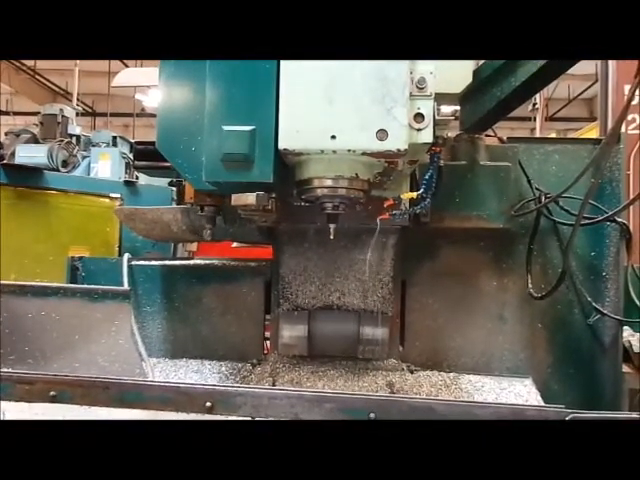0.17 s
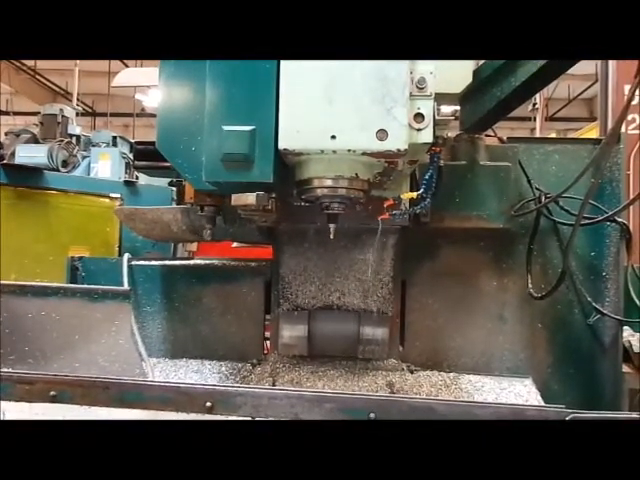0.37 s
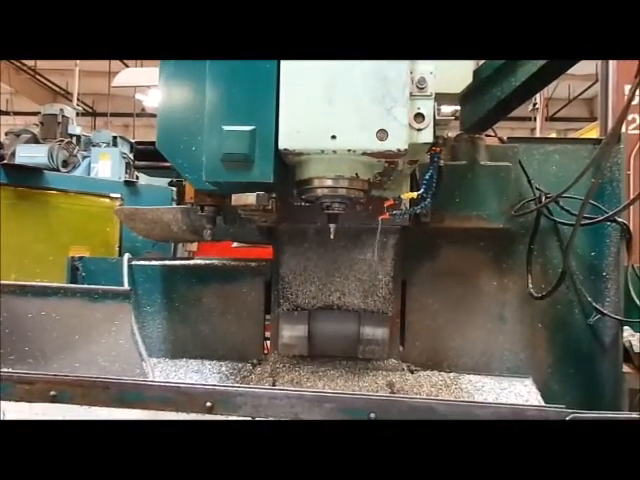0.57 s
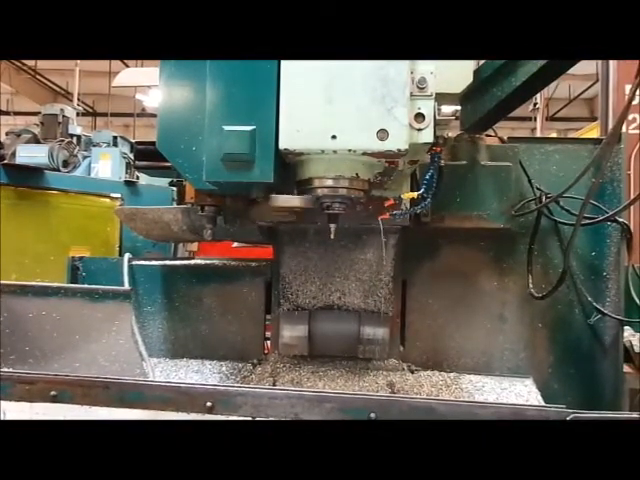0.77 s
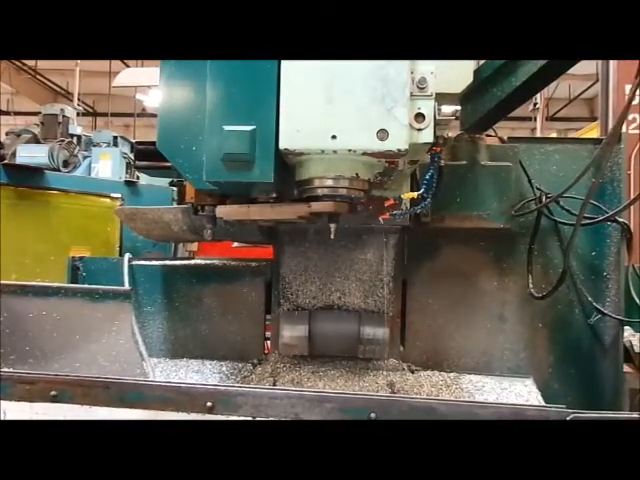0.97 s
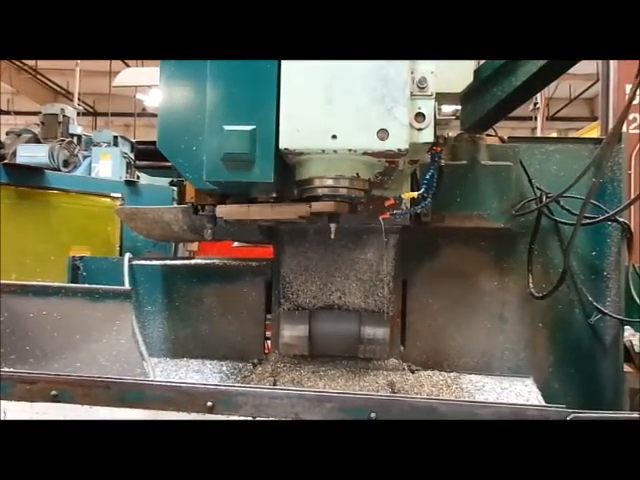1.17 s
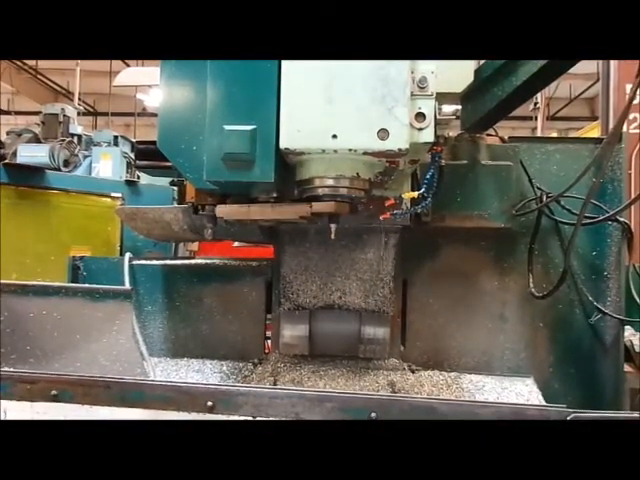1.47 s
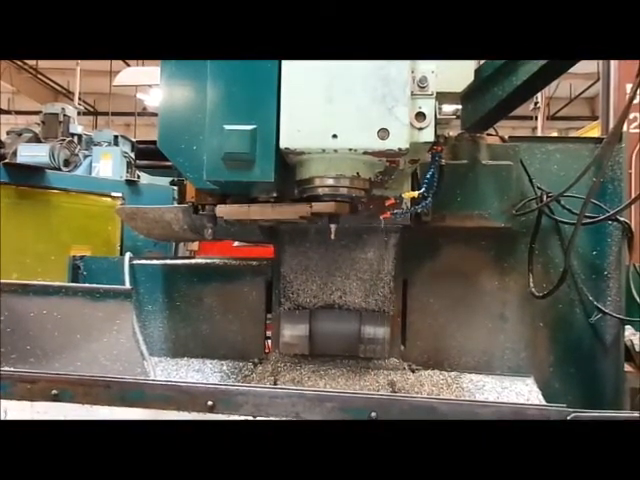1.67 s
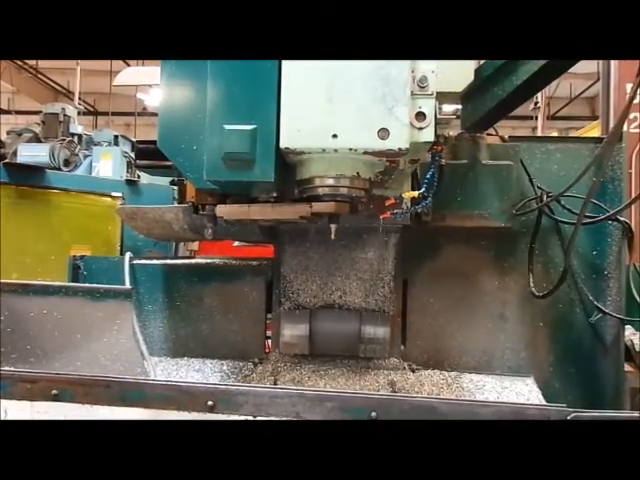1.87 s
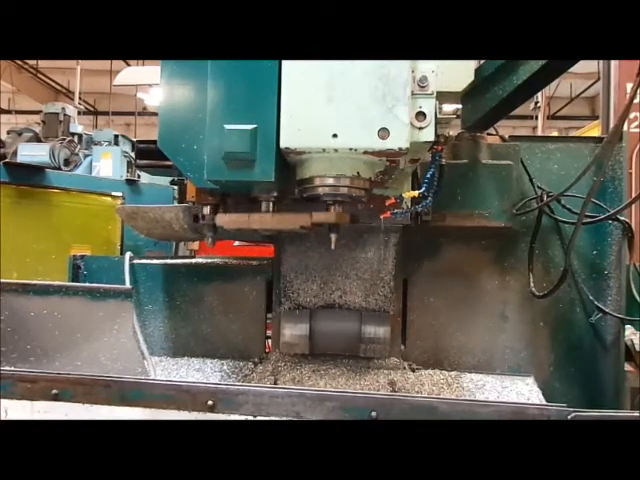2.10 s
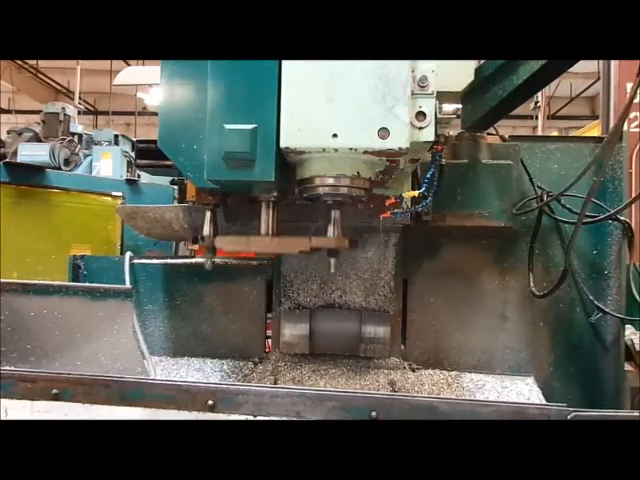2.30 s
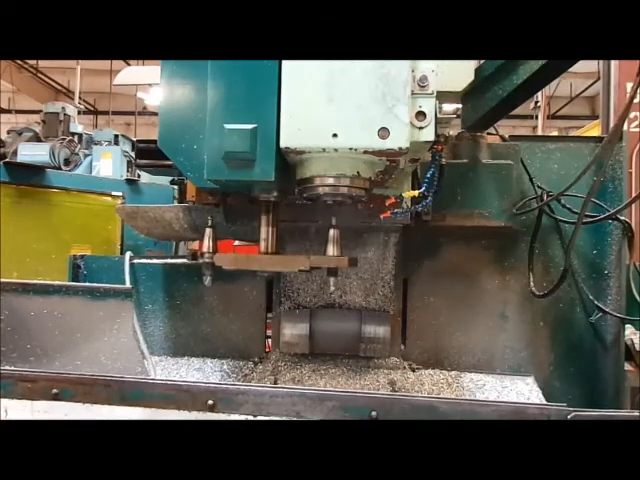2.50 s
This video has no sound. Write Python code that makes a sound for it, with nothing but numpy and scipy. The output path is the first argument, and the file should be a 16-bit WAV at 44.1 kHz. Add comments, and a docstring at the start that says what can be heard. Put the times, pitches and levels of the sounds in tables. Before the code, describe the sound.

A milling machine changes its tool over steady fan and pump hum. Latch clacks at 0.4-0.6 s, uneven drive rumble from 0.7, a hard steel clank at 0.9-1.0 with short hall tail, and lock clacks near 1.25-1.3. Thin bright air hiss grows from 1.5; a bang at 2.04 opens into a loud, turbulent, ringing blast from 2.13, faintly whistling, with a dull thump and shudder at 2.5 as it continues to the end.

```python
"""A milling machine changes its tool in a humming workshop, with hard walls close to the air jet.
First the changer arm unlatches, swings on a rumbling drive and clanks onto the tool holders: noise bursts
and decaying sines, with a short hall tail. Compressed air then hisses through the spindle as combed noise,
and the drawbar lets go with a bang. Turbulent noise roars through the ringing, opening taper and its gap
whistles, while the arm pulls the tools down, thumps against its stop and shudders."""
import sys
import numpy as np
from scipy import signal
from scipy.fft import rfft, irfft, next_fast_len
from scipy.io import wavfile
from scipy.ndimage import uniform_filter1d, map_coordinates

SR = 44100
rng = np.random.default_rng(int(sys.argv[2]) if len(sys.argv) > 2 else 0)


def master_out(mix):
    """Clip the mix to full scale and print it as 16-bit PCM to the path in sys.argv[1]."""
    frames = np.transpose(np.atleast_2d(mix))
    ceiling = np.clip(frames, -1, 1)
    pcm = np.round(ceiling * 32767).astype(np.int16)
    wavfile.write(sys.argv[1], SR, pcm)


N = 116865  # samples, 2.65 s

# Colour of the workshop rush: (frequency [Hz], relative level per Hz [dB])
SHOP_COLOUR = [(25, -22), (45, -16), (75, -13), (130, -7), (200, -4), (300, -3), (420, -1), (600, 0),
               (850, -1.5), (1250, -4), (1800, -6), (2700, -8.5), (4000, -14), (5700, -22), (8500, -25),
               (10300, -25), (11000, -15.5), (12600, -19), (15000, -28)]
# Motor and pump tones, before drift and flutter: (frequency [Hz], rms level [dB])
HUM_TONES = [(58, -55), (178, -53), (269.5, -44), (533, -46), (985, -48)]
# Drive of the swinging arm, before its unevenness: (start [s], attack [s], hold [s], t60 [s], level [dB])
SWING_BURST = (.68, .06, .62, .9, -33.5)
# Colour of the arm's drive: (frequency [Hz], relative level per Hz [dB])
SWING_COLOUR = [(60, -25), (95, -8), (135, 6), (185, -3), (400, 0), (750, 0), (1500, -3.5), (3000, -8),
                (5000, -19), (9000, -25), (14000, -35)]

# Modes of the struck latch: (frequency [Hz], level relative to the clack [dB], t60 [s])
LATCH = [(1550, -3, .06), (2230, 0, .05), (12700, -14, .04)]
# Modes of the cam: (frequency [Hz], level relative to the clack [dB], t60 [s])
CAM = [(1530, 3, .06), (1950, -2, .08), (3550, -8, .05)]
# Modes of the gripping jaw: (frequency [Hz], level relative to the clack [dB], t60 [s])
JAW = [(1290, -4, .06), (3270, 1, .03), (5550, -4, .02)]
# Modes of the tool holder: (frequency [Hz], level relative to the clack [dB], t60 [s])
HOLDER = [(430, -13, .15), (820, -9, .07), (1680, -10, .15), (2320, -1, .05), (3488, -15, .16),
          (4050, -11, .06)]
# Modes of the lock: (frequency [Hz], level relative to the clack [dB], t60 [s])
LOCK = [(790, -2, .06), (1600, -1, .014), (2400, 4, .012)]
# Mode of the buffer: (frequency [Hz], level relative to the clack [dB], t60 [s])
BUFFER = [(740, 12, .035)]
# Blows of the changer: (time [s], part struck, thud [dB], clang [dB], clack [dB], crack [dB],
# factor on the t60 of the four noise layers)
BLOWS = [(.392, LATCH, -35, -21.5, -18, -40, 1.0), (.409, BUFFER, -35, -22, -33, -50, .8),
         (.4735, CAM, -32, -20, -20.5, -35, 1.2), (.503, BUFFER, -35, -25, -37, -55, .8),
         (.537, LATCH, -35, -24, -28, -43, 1.3), (.577, CAM, -34, -22, -36, -55, .9),
         (.665, CAM, -30, -34, -36, -33, 2.0), (.835, JAW, -45, -38, -31, -23, 1.0),
         (.898, JAW, -26, -19, -12.5, -10, .36), (.905, JAW, -33, -18, -13, -32, .9),
         (.9365, HOLDER, -18, -11, -5.5, -13, 1.2), (.961, HOLDER, -21, -16, -15, -23, 1.6),
         (.985, HOLDER, -19, -17, -13, -20, 1.4), (1.236, JAW, -42, -35, -28, -43, .6),
         (1.2655, LOCK, -33, -19.5, -16, -48, .7), (1.28, BUFFER, -32, -13.5, -28, -55, .38),
         (1.307, LOCK, -28, -19, -13.5, -48, .5)]
# Lowest noise layer of a blow: (colour as (frequency [Hz], relative level per Hz [dB]), attack [s],
# t60 before the blow's factor [s])
THUD_LAYER = ([(50, -26), (95, -12), (128, 4), (190, -4), (310, 3), (480, -2), (750, -20), (2000, -60)],
              .008, .25)
# Low-mid layer: (colour as (frequency [Hz], relative level per Hz [dB]), attack [s], t60 before factor [s])
CLANG_LAYER = ([(200, -28), (450, -4), (600, 0), (780, 0), (1000, -2), (1500, -13), (4000, -60)], .002, .11)
# Upper-mid layer: (colour as (frequency [Hz], relative level per Hz [dB]), attack [s], t60 before factor [s])
CLACK_LAYER = ([(500, -25), (1100, -3), (1600, 1), (2350, 0), (3200, -8), (4400, -21), (7000, -38),
               (15000, -60)], .0006, .075)
# Treble layer: (colour as (frequency [Hz], relative level per Hz [dB]), attack [s], t60 before factor [s])
CRACK_LAYER = ([(1800, -25), (3800, 3), (5000, -2), (6200, 0), (9000, -3), (12500, -8), (14500, -13)],
               .0004, .07)
# Resonances of the steel housing: (frequency [Hz], width [Hz], level [dB])
HOUSING_MODES = [(400, 120, -4), (530, 90, -6), (770, 90, -2), (1170, 25, -3), (1670, 40, -1),
                 (1840, 25, -1), (2126, 20, 0), (2830, 74, -4), (3410, 150, -5), (4350, 40, 0)]
# Decay of the hall: (frequency [Hz], t60 [s])
HALL_DECAY = [(150, .7), (1500, .6), (5000, .5), (14000, .3)]

# Thump of the arm on its stop: (start [s], attack [s], hold [s], t60 [s], level [dB])
STOP_BURST = (2.522, .016, .028, .38, -17.5)
# Colour of the thump: (frequency [Hz], relative level per Hz [dB])
STOP_COLOUR = [(40, -24), (85, -8), (130, -2), (310, 5), (500, -1), (900, -5), (2000, -22), (6000, -50)]
# Shudder of the landed arm: (start [s], attack [s], hold [s], t60 [s], peak level [dB])
SHUDDER_BURST = (2.575, .02, .012, .12, -21)
# Bang of the released tool: (start [s], attack [s], hold [s], t60 [s], level [dB])
RELEASE_BURST = (2.041, .005, .016, .032, -8)
# Colour of the bang: (frequency [Hz], relative level per Hz [dB])
RELEASE_COLOUR = [(40, -18), (200, -14), (350, 2), (600, -6), (1100, -2.5), (1750, 0), (2600, -6),
                  (3600, -4), (6200, -15), (9300, -10), (15000, -14)]
# Boom of the spindle head: (start [s], attack [s], hold [s], t60 [s], level [dB])
BOOM_BURST = (2.048, .01, .018, .26, -22)
# Colour of the boom: (frequency [Hz], relative level per Hz [dB])
BOOM_COLOUR = [(30, -17), (130, -5), (350, 1), (800, -3), (1500, -6), (3000, -9), (6000, -25), (12000, -45)]

# Air spits of the valve: (start [s], attack [s], hold [s], t60 [s], level [dB])
VALVE_SPITS = [(1.513, .003, .008, .05, -27), (1.548, .002, .003, .03, -30)]
# Colour of the valve spits before the comb: (frequency [Hz], relative level per Hz [dB])
VALVE_COLOUR = [(1500, -25), (6000, -14), (10000, -6), (13000, -3), (14500, 5)]
# Air through the closed spindle, before its wobble: (time [s], level [dB])
PURGE_FLOW = [(1.505, -70), (1.517, -38), (1.56, -31), (1.64, -22.5), (1.70, -18.9), (1.79, -17),
              (2.02, -15.5), (2.11, -18), (2.2, -21), (2.65, -40)]
# Colour of that air before the comb: (frequency [Hz], relative level per Hz [dB])
PURGE_COLOUR = [(200, -15), (1500, -8), (3500, -4), (4150, 1.5), (4600, -2.5), (5300, 0), (6700, -4),
                (7870, 3), (8500, -1), (9220, 3), (9700, -1), (12200, -1), (12800, 5), (13150, 9),
                (13450, 1), (13850, 2), (15000, -4)]
# Spit as the taper unseats: (start [s], attack [s], hold [s], t60 [s], level [dB])
SEAL_SPIT = (2.125, .004, .018, .09, -9)
# Colour of the taper's spit before the comb: (frequency [Hz], relative level per Hz [dB])
SPIT_COLOUR = [(1500, -25), (4000, -10), (7000, -5), (10000, -2), (13000, 1), (15000, -4)]
# Air through the opening taper, before its wobble: (time [s], level [dB])
BLAST_FLOW = [(2.118, -70), (2.133, -18), (2.17, -17.5), (2.24, -16), (2.3, -15), (2.37, -12.4),
              (2.41, -12.7), (2.46, -10.8), (2.51, -13), (2.56, -11.3), (2.65, -11.3)]
# Colour of the blast before comb and turbulence: (frequency [Hz], relative level per Hz [dB])
BLAST_COLOUR = [(250, -26), (650, -8), (950, 1), (1150, -2), (1400, -4.5), (3000, 0), (3850, -2), (4300, 3),
                (4900, 3), (5400, -1), (6500, 2), (7800, 1), (8750, 4), (9500, -2), (11200, -1), (12500, 3),
                (13400, 2), (14500, -6), (15000, -14)]
# Cavity between tool holder and spindle, before the gain is raised to a power:
# (frequency [Hz], width [Hz], level [dB])
TAPER_MODES = [(465, 20, -8), (820, 45, -9), (950, 70, -9), (1600, 60, -7), (1740, 47, -6), (1988, 60, 1),
               (2170, 75, -.5), (2262, 50, .5), (2565, 85, -2.5), (2762, 25, -2), (2875, 65, .5),
               (3072, 45, -3), (3200, 90, -1), (3380, 50, -4), (3695, 30, -6), (4280, 200, -11),
               (4800, 130, -10), (5055, 25, -7)]
# Ringing of the cavity, before its wobble: (time [s], level [dB])
TAPER_RING = [(2.04, -70), (2.052, -19), (2.122, -31), (2.134, -14.5), (2.18, -17), (2.24, -15),
              (2.3, -13.5), (2.37, -10), (2.41, -11.5), (2.46, -9.7), (2.51, -10.5), (2.65, -9.3)]
# Opening of the gap: (time [s], share open [0 to 1])
GAP_OPENING = [(2.2, 0), (2.5, 1)]
# Whistle of the gap: (start [s], attack [s], hold [s], t60 [s], level [dB])
WHISTLE_BURST = (2.28, .03, .15, 2.5, -22)
# Resonance of the whistle, before squaring: (frequency [Hz], width [Hz], level [dB])
WHISTLE_MODE = [(12680, 260, 0)]

# Stereo width: side level relative to mid [dB]
SHOP_SIDE_DB, CHANGER_SIDE_DB, PURGE_SIDE_DB = -75, -45, -27
BLAST_SIDE_DB, CAVITY_SIDE_DB, HEAD_SIDE_DB = -13, -22, -15


def amp(db):
    """Decibels to gain."""
    return 10 ** (np.asarray(db) / 20)


def unit(x):
    """Scale to rms 1."""
    return x / np.sqrt(np.mean(x ** 2) + 1e-20)


def along(points, hz):
    """Interpolate (Hz, value) points on a log frequency axis."""
    frequencies, values = np.transpose(points)
    return np.interp(np.log(hz + 1), np.log(frequencies + 1), values)


def level(rows):
    """Gain per sample from (s, dB) points, at -120 dB before the first."""
    times, db = np.transpose(rows)
    return amp(np.interp(np.arange(N) / SR, times, db, left=-120))


def wobble(rate):
    """A smooth random curve with rate knots a second."""
    knots = rng.standard_normal(int(N * rate / SR) + 4)
    return map_coordinates(knots, [np.arange(N) * rate / SR])


def envelope(start, attack, hold, t60, db):
    """Linear attack, hold, exponential release."""
    t = np.arange(N) / SR - start
    release = 1000.0 ** (-np.maximum(t - attack - hold, 0) / t60)
    return np.clip(t / attack, 0, 1) * amp(db) * release


def filtered(x, response):
    """Multiply the spectrum of x by a response of frequency."""
    size = next_fast_len(N + 8192)
    return irfft(rfft(x, size) * response(np.fft.rfftfreq(size, 1 / SR)), size)[..., :N]


def resonances(modes, hz):
    """Gain of a bank of (Hz, width, dB) resonances, summed in power."""
    power = 0
    for centre, width, db in modes:
        damping = (hz * width) ** 2
        power = power + amp(2 * db) * damping / ((centre ** 2 - hz ** 2) ** 2 + damping)
    return np.sqrt(power)


def noise(gain, side_db):
    """Mid-side noise of rms 1, coloured by a gain of frequency."""
    mid, side = filtered(rng.standard_normal((2, N)), gain)
    side = amp(side_db) * side
    return unit(np.array([mid + side, mid - side]))


def rush(spectrum, side_db):
    """Noise with a (Hz, dB) spectrum."""
    return noise(lambda hz: amp(along(spectrum, hz)), side_db)


def workshop():
    """Fans and pumps in the background: a steady rush with slightly unsteady tones."""
    drift_hz, flutter_db = 3, 3.2
    tones = 0
    for frequency, db in HUM_TONES:
        gain = amp(db + flutter_db * wobble(8))
        phase = 2 * np.pi * np.cumsum(frequency + drift_hz * wobble(6)) / SR
        tones = tones + gain * np.sin(phase)
    rush_level = amp(-30 + .4 * wobble(12))
    return rush_level * rush(SHOP_COLOUR, SHOP_SIDE_DB) + np.sqrt(2) * tones  # sqrt(2): peak for rms 1


def hall(x):
    """The workshop's tail: decaying noise in which the treble dies first."""
    hz, t, z = signal.stft(rng.standard_normal(SR // 2), SR, nperseg=256)
    decay = np.exp(-np.log(1000) * t / along(HALL_DECAY, hz)[:, None])
    tail = signal.istft(z * decay, SR, nperseg=256)[1]
    tail = tail / np.linalg.norm(tail)
    return amp(-9) * signal.fftconvolve(x, tail[None], axes=1)[:, :N]


def arm_swing():
    """The drive rumbles unevenly while the arm turns: noise with a wobbling level."""
    uneven = amp(1.5 * wobble(25))
    return envelope(*SWING_BURST) * uneven * rush(SWING_COLOUR, SHOP_SIDE_DB)


def changer():
    """Noise for the housing's dense modes; the low layers build up later and last longer."""
    def housing(hz):
        return resonances(HOUSING_MODES, hz) + amp(-7)  # diffuse floor between the modes

    chatter = unit(amp(1.5 * wobble(300)))  # fast level unevenness
    out = np.zeros((2, N))
    layers = [THUD_LAYER, CLANG_LAYER, CLACK_LAYER, CRACK_LAYER]
    for layer, (spectrum, attack, t60) in enumerate(layers):
        energy = np.zeros(N)
        for start, part, *levels_db, length in BLOWS:
            energy += envelope(start, attack, 0, t60 * length, levels_db[layer]) ** 2
        colour = lambda hz: amp(along(spectrum, hz)) * housing(hz)
        out += np.sqrt(energy) * noise(colour, CHANGER_SIDE_DB)
    return out * chatter


def contacts():
    """Steel meets steel: every blow rings the struck part's modes as decaying sines."""
    pitch_scatter, rise_s = .004, .0004  # each blow lands elsewhere: relative spread of the mode pitches
    out = np.zeros(N + SR)
    t = np.arange(SR // 2) / SR
    rise = 1 - np.exp(-(t / rise_s) ** 2)
    for start, part, thud_db, clang_db, clack_db, crack_db, length in BLOWS:
        detune = np.exp(pitch_scatter * rng.standard_normal(len(part)))
        ring = np.zeros(len(t))
        for (hz, db, t60), shift in zip(part, detune):
            decay = np.exp(-np.log(1000) * t / t60)
            ring += amp(db) * decay * np.sin(2 * np.pi * hz * shift * t)
        first = round(start * SR)
        out[first:first + len(t)] += amp(clack_db) * ring * rise
    return out[:N]


def arm_stop():
    """The lowered arm thumps at the end of its stroke as a noise burst, then shudders as a low sine."""
    shudder_hz = 146
    thump = envelope(*STOP_BURST) * rush(STOP_COLOUR, HEAD_SIDE_DB)
    shudder = envelope(*SHUDDER_BURST) * np.sin(2 * np.pi * shudder_hz * np.arange(N) / SR)
    return thump + shudder


def drawbar():
    """The tool is knocked loose: a short noise bang and a longer boom of the spindle head."""
    bang = envelope(*RELEASE_BURST) * rush(RELEASE_COLOUR, HEAD_SIDE_DB)
    boom = envelope(*BOOM_BURST) * rush(BOOM_COLOUR, HEAD_SIDE_DB)
    return bang + boom


def comb(hz):
    """Irregular ripple that hard walls close to the jet put on its spectrum."""
    depth_db, spacing_hz = 2.2, 45
    ripple = map_coordinates(rng.standard_normal(4096), [hz / spacing_hz], mode="wrap")
    return amp(depth_db * ripple)


def hiss(spectrum, side_db):
    """Jet noise with a (Hz, dB) spectrum, combed by the walls."""
    return noise(lambda hz: amp(along(spectrum, hz)) * comb(hz), side_db)


def turbulent(x):
    """Turbulence: give a noise short-lived patches of random gain in time and frequency."""
    depth_db = 2.3
    z = signal.stft(x, nperseg=1024)[2]
    field = rng.standard_normal(z.shape[1:])
    field = uniform_filter1d(field, size=5, axis=0)  # smooth over frequency
    field = uniform_filter1d(field, size=5, axis=1)  # smooth over time
    patched = signal.istft(z * amp(depth_db * unit(field)), nperseg=1024)[1]
    return unit(patched[:, :N])


def taper():
    """The cavity rings in narrow strands while nearly shut and fills out as the gap opens."""
    opening = np.interp(np.arange(N) / SR, *np.transpose(GAP_OPENING))
    # a higher power narrows the resonances
    shut = noise(lambda hz: resonances(TAPER_MODES, hz) ** 1.8, CAVITY_SIDE_DB)
    wide = noise(lambda hz: resonances(TAPER_MODES, hz) ** 1.3, CAVITY_SIDE_DB)
    return turbulent(np.sqrt(1 - opening) * shut + np.sqrt(opening) * wide)


def air():
    """Valve spits and a thin hiss; the taper unseats with a spit, then a blast, ringing cavity and whistle."""
    valve = sum(envelope(*spit) for spit in VALVE_SPITS) * hiss(VALVE_COLOUR, CHANGER_SIDE_DB)
    purge = level(PURGE_FLOW) * amp(.3 * wobble(30)) * hiss(PURGE_COLOUR, PURGE_SIDE_DB)
    seal = envelope(*SEAL_SPIT) * hiss(SPIT_COLOUR, BLAST_SIDE_DB)
    jet = level(BLAST_FLOW) * turbulent(hiss(BLAST_COLOUR, BLAST_SIDE_DB))
    cavity = level(TAPER_RING) * taper()
    whistle_noise = noise(lambda hz: resonances(WHISTLE_MODE, hz) ** 2, BLAST_SIDE_DB)
    whistle = envelope(*WHISTLE_BURST) * whistle_noise
    unsteady = amp(.8 * wobble(45))  # shared by jet and cavity
    return valve + purge + seal + whistle + unsteady * (jet + cavity)


def scene():
    """The tool change over the noise of the workshop; only the clanks are sent to the hall."""
    clanks = changer() + contacts()
    background = workshop() + arm_swing()
    return background + clanks + hall(clanks) + arm_stop() + drawbar() + air()


def record(dry):
    """The recorder rounds off the highest peaks and keeps nothing above its band limit."""
    ceiling, top_hz = 1.05, 15050
    clipped = dry / (1 + np.abs(dry / ceiling) ** 6) ** (1 / 6)
    return filtered(clipped, lambda hz: hz < top_hz)


dry = scene()
out = record(dry)
master_out(out)
```